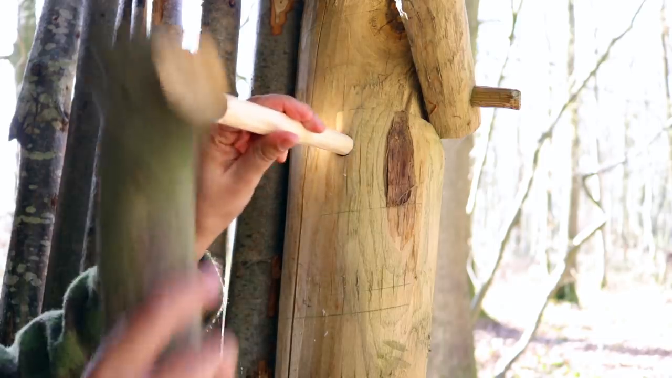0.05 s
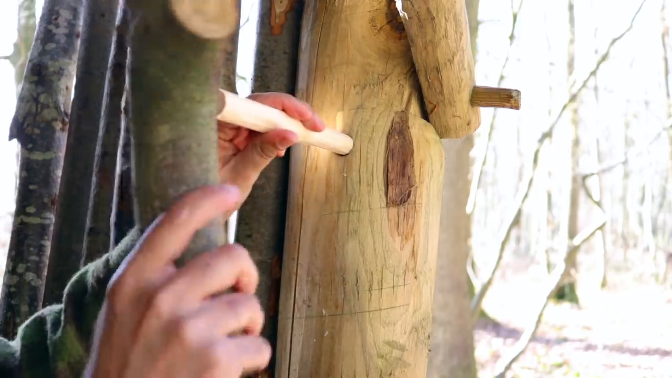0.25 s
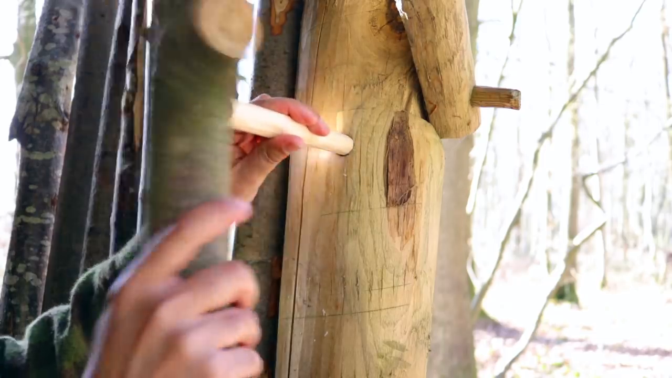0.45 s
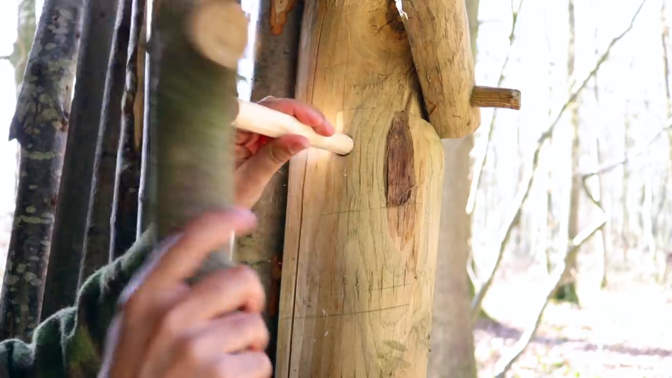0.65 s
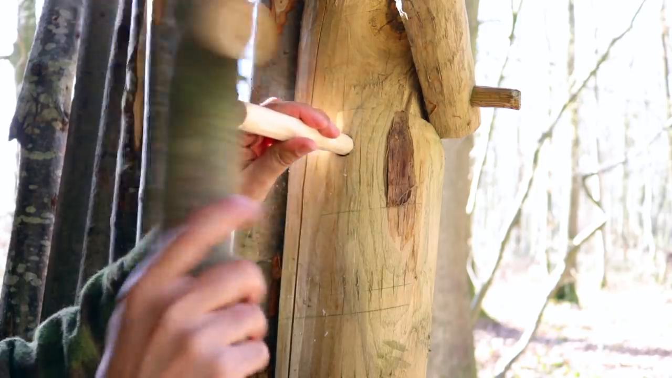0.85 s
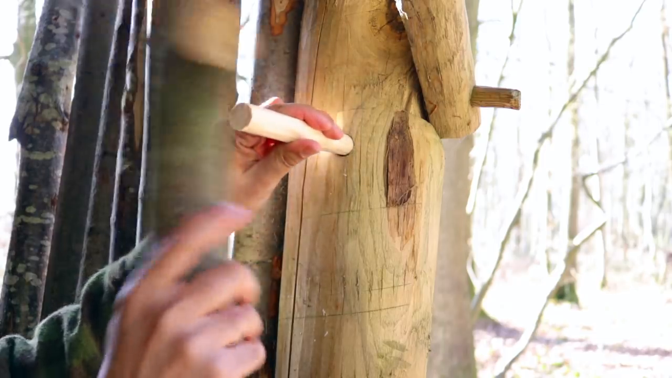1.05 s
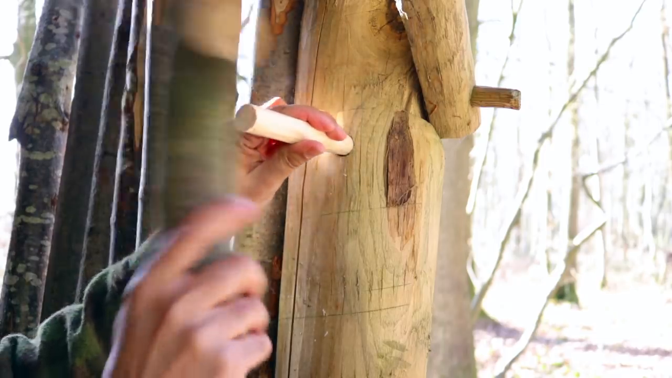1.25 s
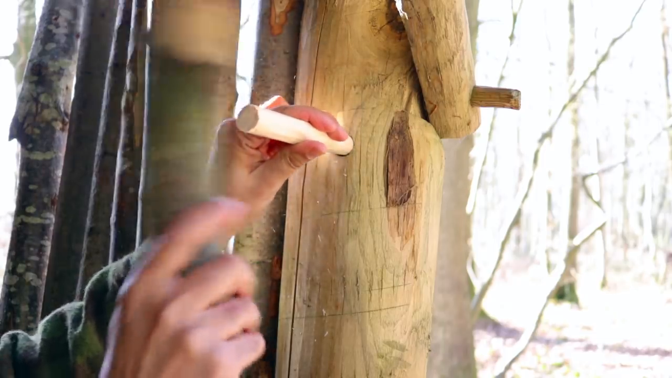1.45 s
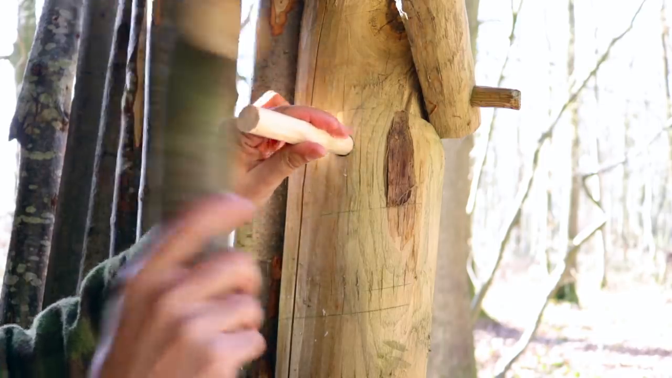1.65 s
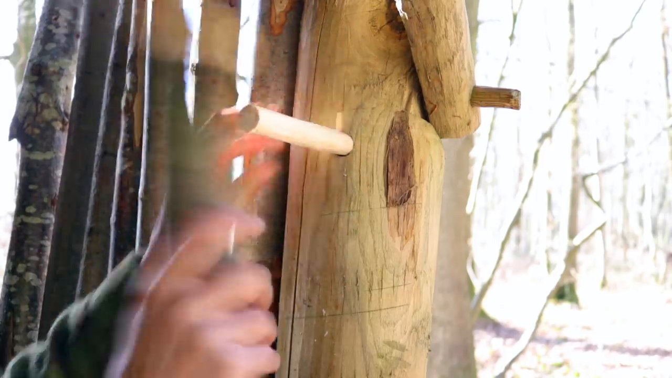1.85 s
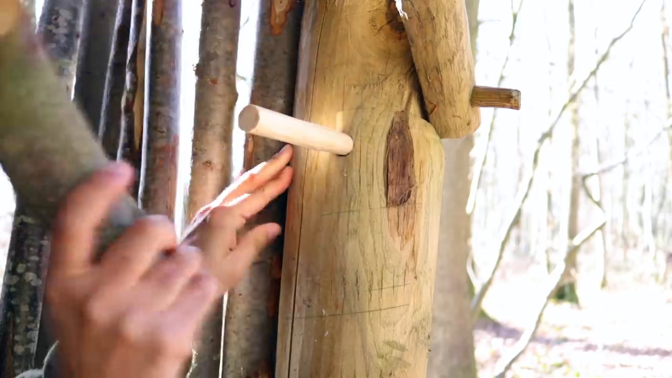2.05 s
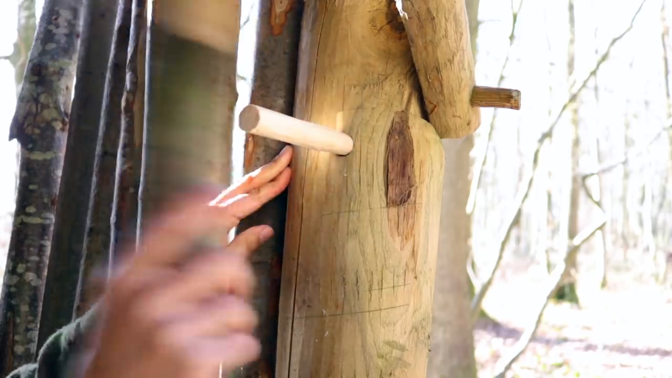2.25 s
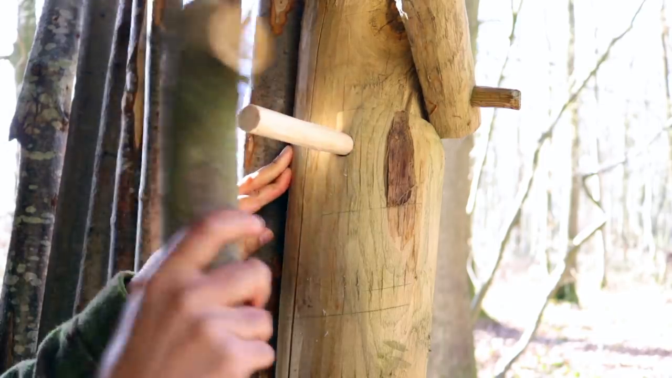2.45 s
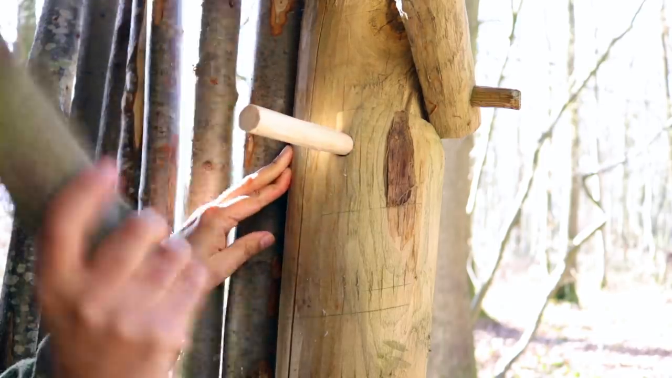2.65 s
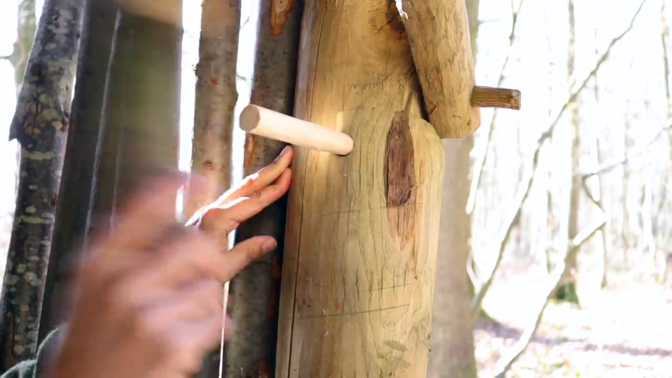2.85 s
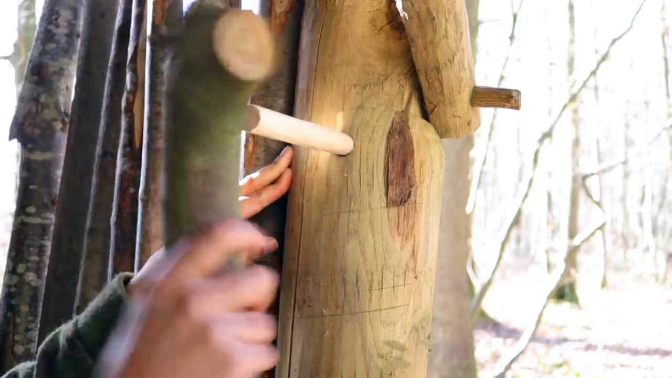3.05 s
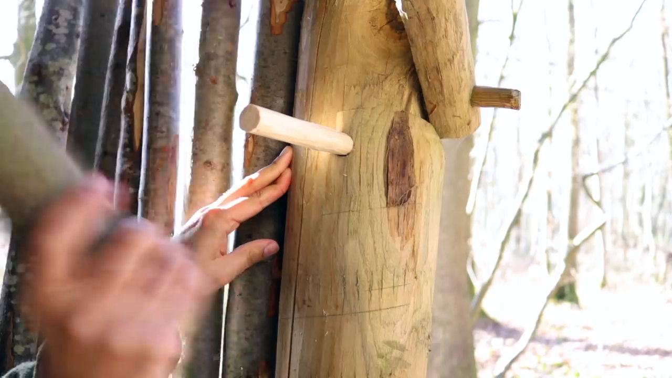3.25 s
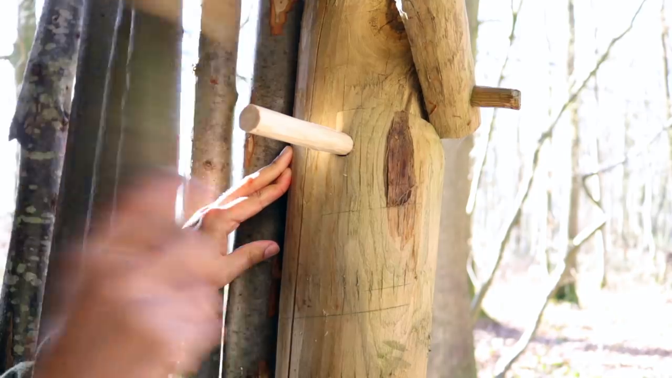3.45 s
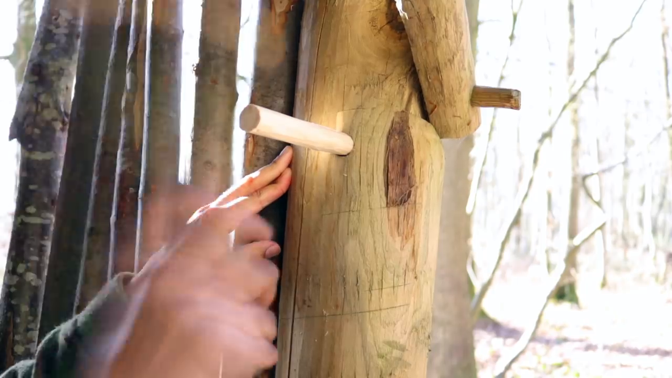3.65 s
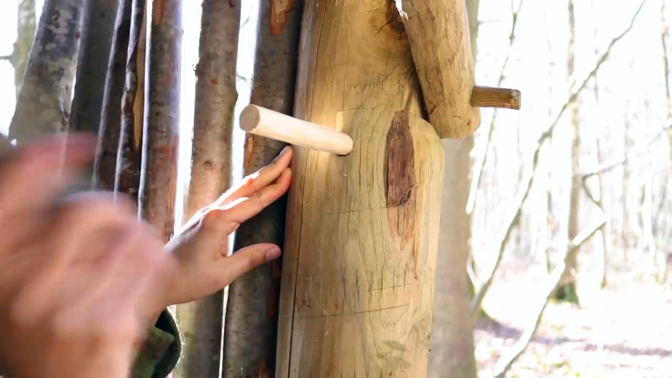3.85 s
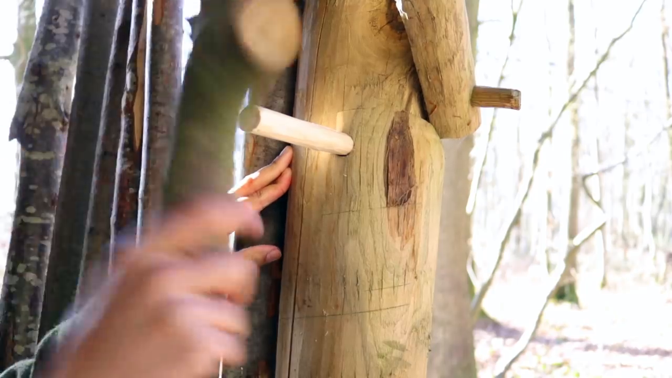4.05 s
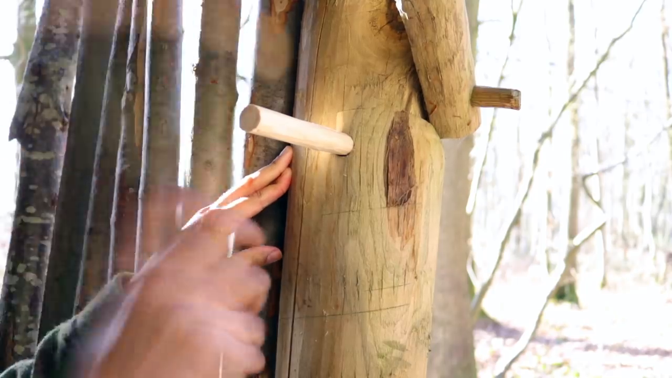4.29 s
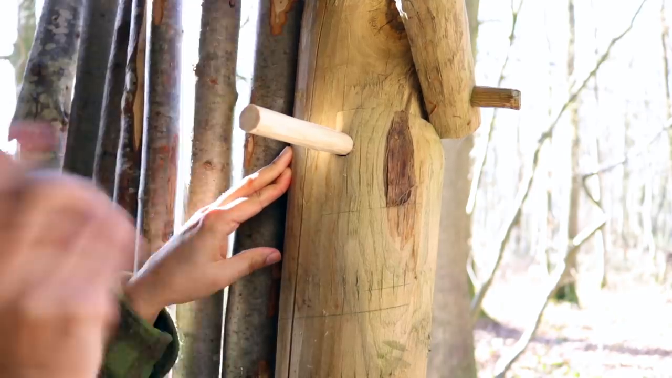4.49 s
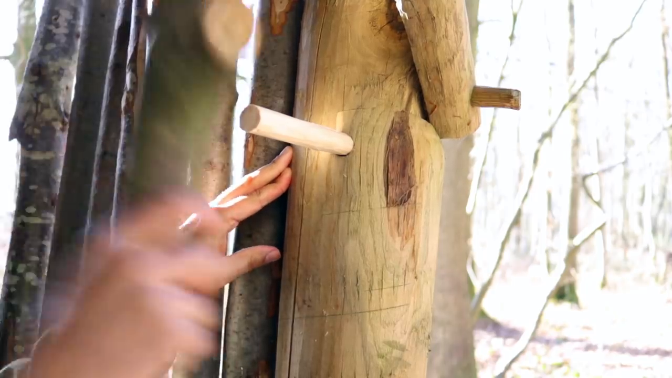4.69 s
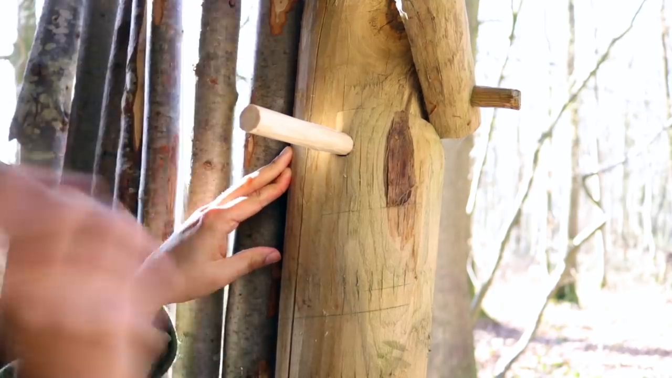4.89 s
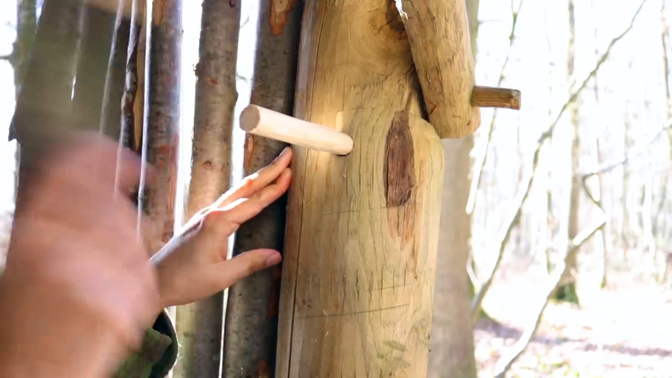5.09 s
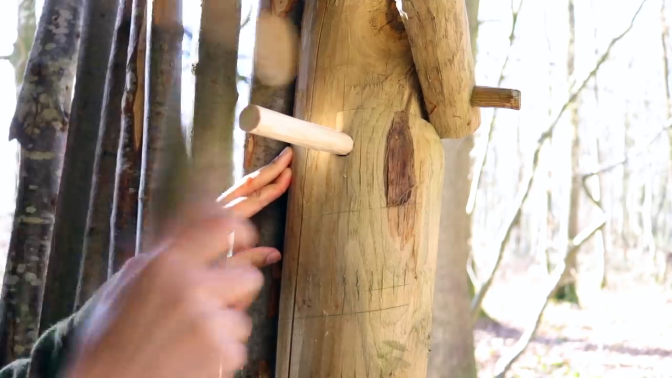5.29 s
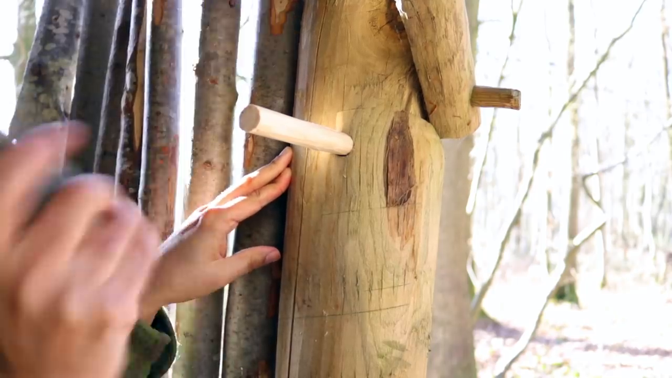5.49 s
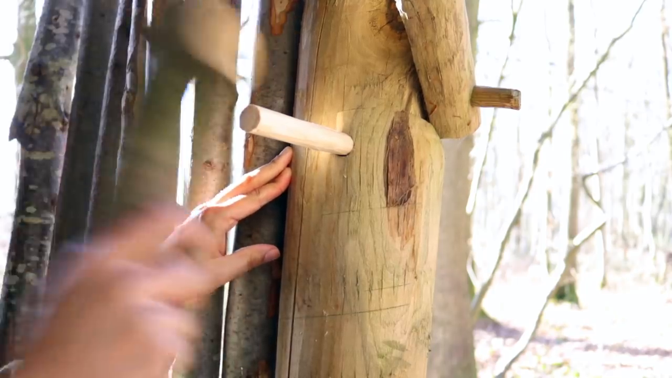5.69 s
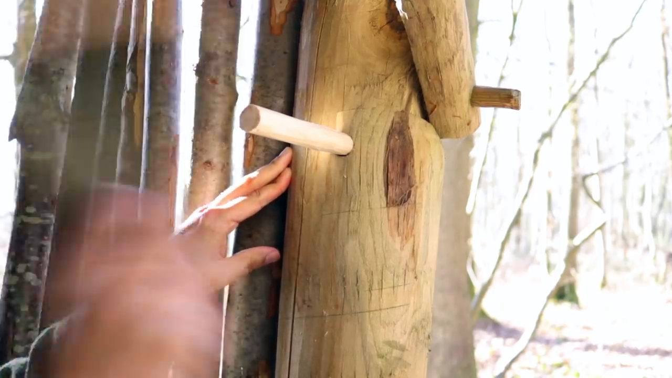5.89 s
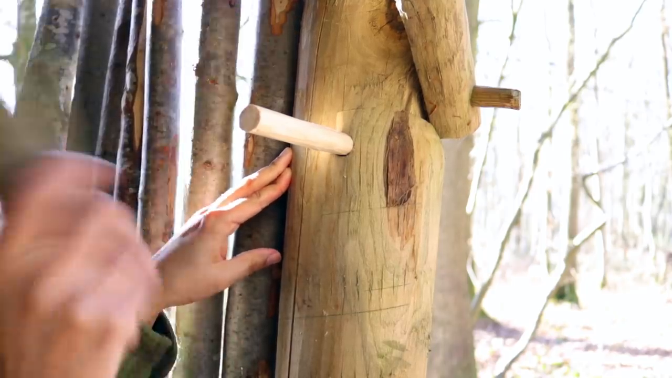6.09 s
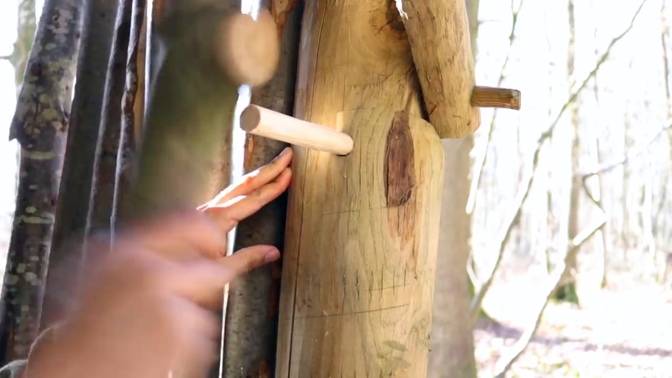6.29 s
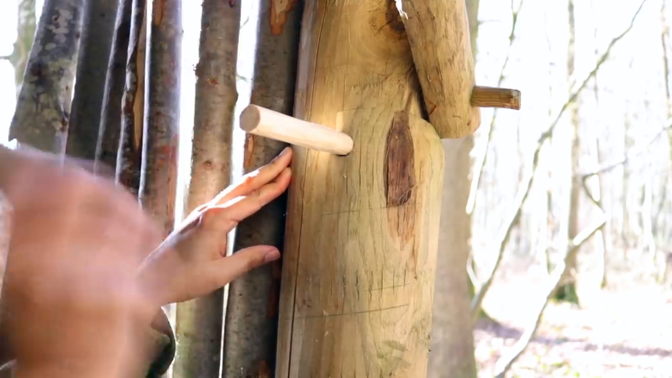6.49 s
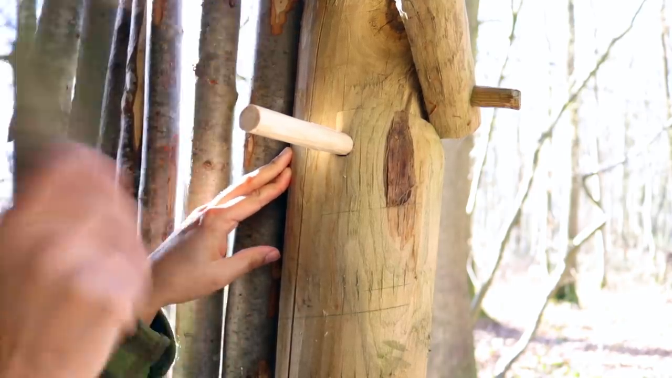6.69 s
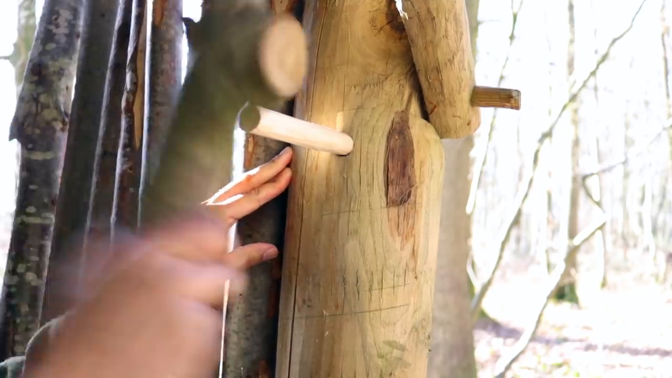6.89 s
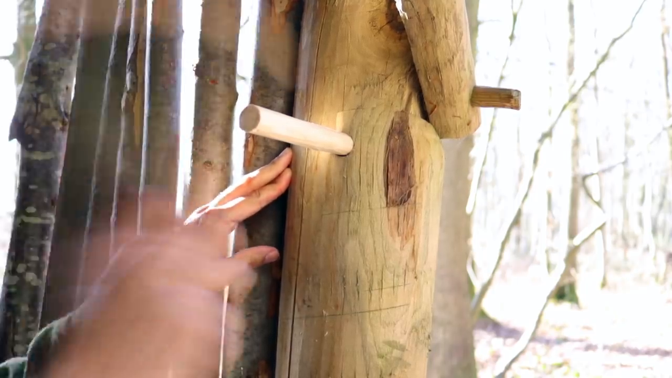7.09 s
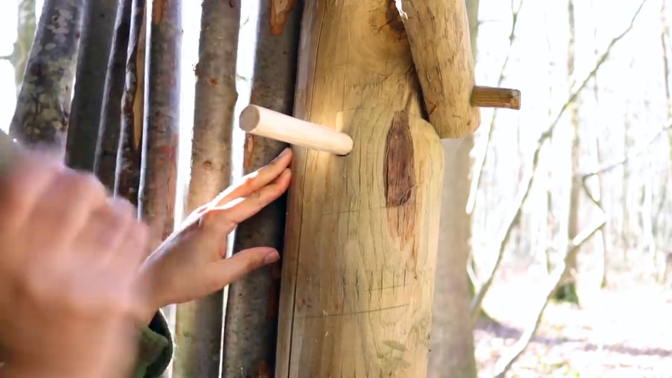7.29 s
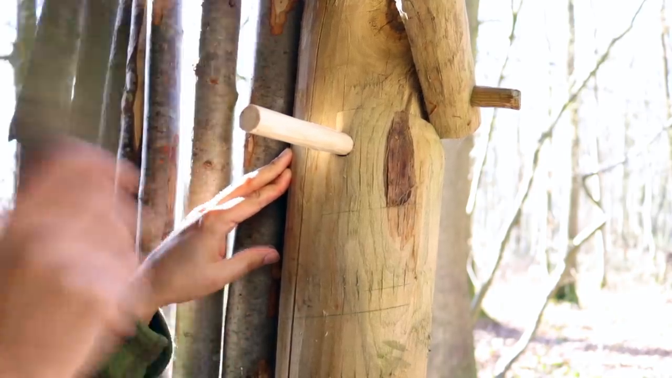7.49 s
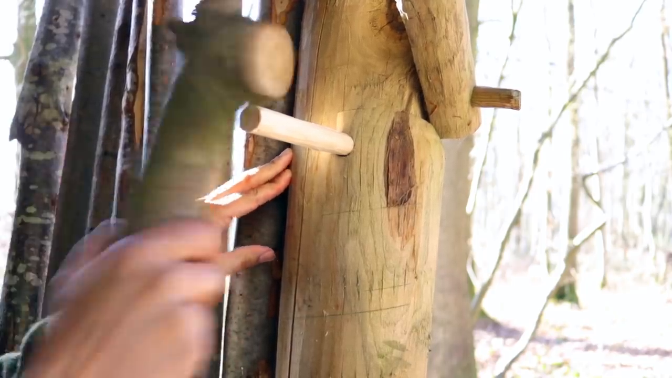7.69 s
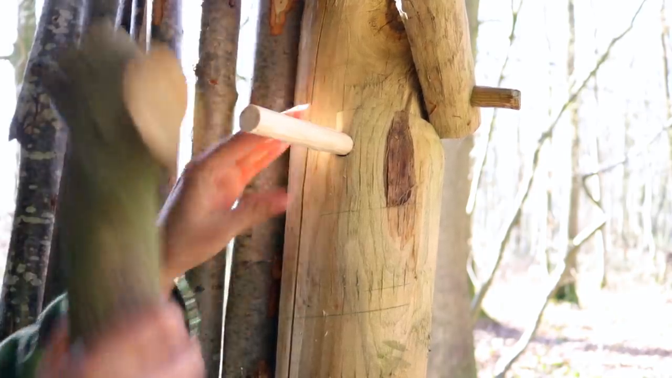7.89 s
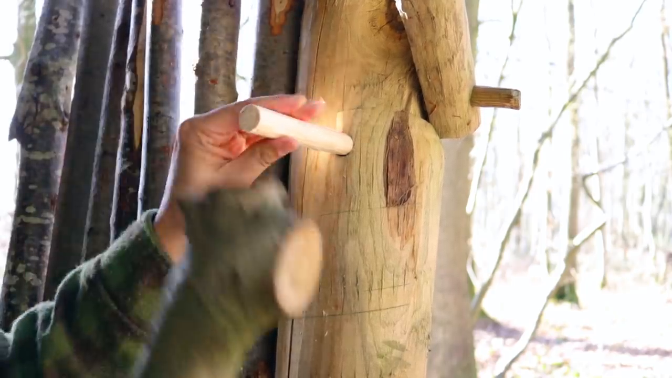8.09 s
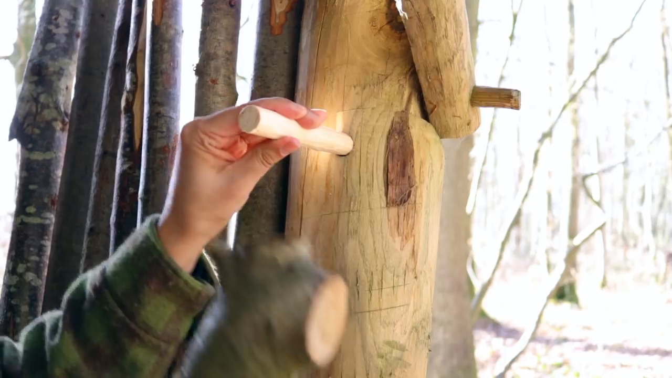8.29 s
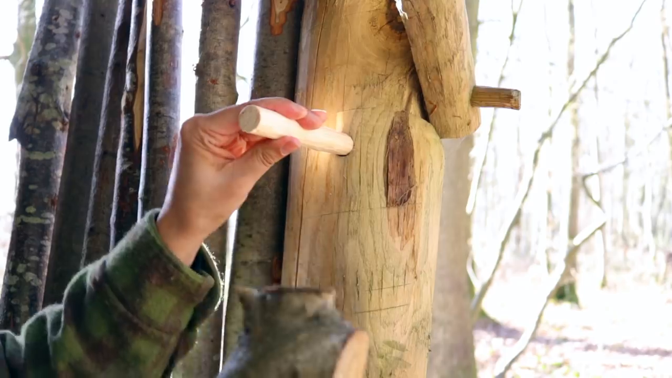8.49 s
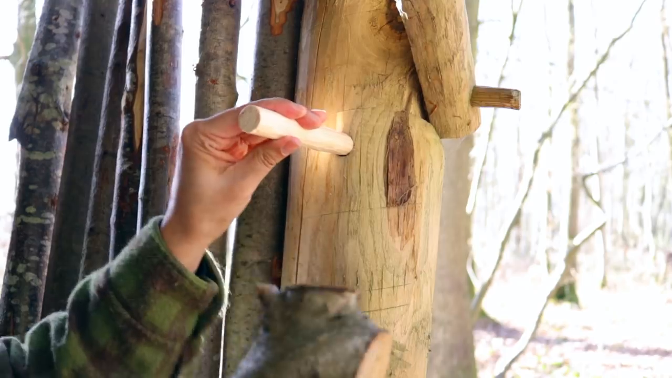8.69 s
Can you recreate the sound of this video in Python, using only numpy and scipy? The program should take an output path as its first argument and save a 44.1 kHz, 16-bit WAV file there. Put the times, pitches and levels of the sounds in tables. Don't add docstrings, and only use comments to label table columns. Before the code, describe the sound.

Outdoor wood-on-wood hammering at arm's length, mono. Bright thin taps about five a second become full, punchy thocks about three a second, with low thump, rattle and brief scatter off ground and trunks. Four faint falling bird phrases sound in the early part. The blows stop after one last hard hit, leaving low traffic hum, hiss and tiny twig ticks.

```python
import sys
import numpy as np
from scipy import signal
from scipy.fft import rfft, irfft
from scipy.io import wavfile
from scipy.ndimage import uniform_filter1d

SR = 44100
rng = np.random.default_rng(int(sys.argv[2]) if len(sys.argv) > 2 else 0)


def level_to_linear(level):
    exponent = np.asarray(level, float) / 20
    return 10 ** exponent


def dump_mix(stems):
    frames = np.atleast_2d(stems).T
    limited = np.clip(frames, -1, 1)
    pcm = np.round(limited * 32767).astype(np.int16)
    wavfile.write(sys.argv[1], SR, pcm)


N = 385343


def band(x, hz, width):
    return signal.lfilter(*signal.iirpeak(hz, hz / width, fs=SR), x)


def filtered(x, order, hz, kind):
    return signal.sosfilt(signal.butter(order, hz, kind, fs=SR, output="sos"), x)


def fade(t, t60):
    return level_to_linear(-60 * t / t60)


def add(track, sound, s):
    i = int(s * SR)
    track[i:i + len(sound)] += sound[:N - i]


# f/Hz, level/dB per Hz
AIR_SPECTRUM = [(20, -6), (69, 1.5), (160, -2), (939, -3.5), (2510, -22.5), (4530, -32), (15200, -36),
                (16500, -44)]


def air():
    level_db, swell_db = -66.5, 1.0
    hz, db = np.transpose(AIR_SPECTRUM)
    f = np.arange(N // 2 + 1) * SR / N + 1
    shape = level_to_linear(np.interp(np.log(f), np.log(hz), db))
    noise = irfft(rfft(rng.standard_normal(N)) * shape, N)
    swell = np.interp(np.arange(N), np.linspace(0, N, 30), rng.standard_normal(30))
    return noise / noise.std() * level_to_linear(level_db + swell_db * swell)


# t/s, peak level/dB, centre f/Hz, decay/ms
TICKS = [
    (0.054, -70, 2500, 12),
    (.18, -69.5, 3500, 10),
    (2.6785, -48, 6900, 0.54),
    (3.567, -55, 3940, 0.63),
    (7.977, -55, 2500, 1.9),
    (8.123, -67, 4000, 2.1),
    (8.145, -76, 3000, 3),
    (8.569, -72, 6000, 1.1),
]


def ticks():
    t = np.arange(SR // 10) / SR
    out = np.zeros(N)
    for s, db, hz, ms in TICKS:
        burst = band(rng.standard_normal(len(t)), hz, hz)
        add(out, level_to_linear(db) * burst * np.exp(-t * 1000 / ms), s)
    return out


# t/s, level/dB, knock f/Hz, rebound lag/ms, rebound level/dB
TAPS = [
    (0.4752, -17.5, 1430, 2.36, 1.5),
    (0.6692, -8, 1590, 2.75, -7),
    (0.8543, -7.5, 1620, 1.61, -4),
    (1.0462, -7, 1300, 2.06, -12.5),
    (1.2407, -3.5, 1530, 1.07, -8.5),
    (1.4352, -3.5, 1394, 1.4, -11),
    (1.6213, -6.5, 1420, 2.1, -10.5),
    (1.9245, -7, 823, 1.74, 0.5),
]
# t/s, level/dB, rebound level/dB, rattle level/dB
BLOWS = [(2.2084, -3.5, 7, 0), (2.5014, -1, 3, 1), (2.7996, 0, -2.5, 0.), (3.0901, 7.5, -1.5, -0.5),
         (3.3910, 6.5, 2, 1), (3.4359, -22, 6, 0.), (3.7248, 2.5, 1.5, 1), (4.0412, 5.5, -3.5, 0.),
         (4.3651, 3, 2, 0.5), (4.6960, 2, 1, -0.5), (5.0209, 1.5, 1, -0.5), (5.3527, 4, -1.5, 0.5),
         (5.672, 3.5, -1.5, -0.5), (5.989, 1, -2, 3.5), (6.298, 4.5, 1.5, 0.5), (6.6179, 4, -3.5, 1),
         (6.9016, 1, 2, 0.5), (7.1718, 1.5, 2.5, 0.), (7.4380, 4, -6.5, 0.), (7.691, 9.5, -2, 0.)]
# t/s, post level/dB, thump level/dB
GRIP = [(.47, -49.5, -64), (.67, -40, -55), (1.05, -38, -48), (1.62, -15.5, -45), (2.2, -7, -28.5),
        (2.85, -3.5, -24.5), (3.05, -2.5, -18), (4.0, -2.5, -16.5), (7.7, -3.5, -16)]


def strokes():
    seated_hz, seated_spread, seated_lag_ms = 676, 0.009, 1.461
    most_post_db = 3.5
    hits = [(*tap, 0) for tap in TAPS]
    for s, db, rebound_db, rattle_db in BLOWS:
        hz = seated_hz * (1 + seated_spread * rng.standard_normal())
        hits.append((s, db, hz, seated_lag_ms, rebound_db, rattle_db))
    grip_s, grip_post_db, grip_thump_db = np.transpose(GRIP)
    rows = []
    for hit in hits:
        share_db = np.interp(hit[0], grip_s, grip_post_db) - hit[1]
        excess_db = max(share_db - most_post_db, 0)
        thump_db = np.interp(hit[0], grip_s, grip_thump_db) - excess_db
        rows.append((*hit, share_db - excess_db, thump_db))
    return rows


def knock_pulse(t, hz, loose):
    seated_cycles, loose_cycles, lean = 0.7, 0.62, 0.2
    age = t * hz / (seated_cycles + loose * (loose_cycles - seated_cycles))
    swell = age ** (1 + lean * loose) * np.exp(1 - age ** (2 - 0.52 * loose))
    knock = np.sin(2 * np.pi * hz * t) * swell
    return knock - swell * knock.sum() / swell.sum()


def low_thump(t):
    peak_ms, width_ms = 3, 5.4
    lurch = (t * 1000 - peak_ms) / width_ms
    return (2 * lurch ** 2 - 1) * np.exp(-lurch ** 2) * np.minimum(t * 2000, 1)


def ring(t, modes, scatter):
    hz, db, t60 = np.transpose(modes)[:, :, None]
    z_db, z_hz = scatter[:, :len(modes), None]
    tone = np.sin(2 * np.pi * hz * (1 + 0.003 * z_hz) * t)
    return np.sum(level_to_linear(db + 1.2 * z_db) * fade(t, t60) * tone, axis=0)


# f/Hz, level/dB, t60/s
POST = [(102, -31.5, 0.22), (162.4, -6.5, 0.062), (258, -33, 0.061), (290, -18.5, 0.15),
        (413.6, -5.5, .055), (516, -6.5, 0.085), (571, -7, 0.034), (665, -28, 0.097), (667, -8.5, 0.029),
        (750, -13.5, 0.055), (875.4, -13, 0.035), (863, -39, 0.086), (1000, -20, 0.015), (357, -17, 0.029)]
# f/Hz, level/dB, t60/s
DOWEL = [(674, -14.5, 0.022), (1200, -23, 0.02), (1537, -12, 0.022), (1928, -4.5, 0.011),
         (2150, -16.5, 0.0081), (2857, -12, 0.02), (3396, -11, 0.011), (4340, -25.5, 0.014),
         (5560, -28.5, .008)]


def mallet():
    crack_db, crack_ms, dowel_db, snap_db = -20.5, 0.72, -6, 23
    t = np.arange(SR // 4) / SR
    thump = low_thump(t)
    close, far, thumps, snap = np.zeros((4, N))
    for s, db, hz, lag_ms, rebound_db, rattle_db, post_db, thump_db in strokes():
        z = rng.standard_normal((2, 32))
        loose = np.clip((-post_db - 5.5) / 12, 0, 1)
        knock = knock_pulse(t, hz, loose)
        crack = level_to_linear(crack_db) * rng.standard_normal(len(t)) * np.exp(-t * 1000 / crack_ms)
        rattle = level_to_linear(dowel_db + rattle_db + loose) * ring(t, DOWEL, 2 * z[::-1])
        push = np.hanning(int(np.clip(4 - 0.26 * db, 2, 30)) + 4)
        push /= push.sum()
        contact = np.convolve(knock + crack + rattle, push)[:len(t)]
        contact = filtered(contact, 2, 20 + 330 * loose, "high")
        post = level_to_linear(db + post_db) * ring(t, POST, z)
        add(close, level_to_linear(db) * contact + post, s)
        add(close, level_to_linear(db + rebound_db) * contact, s + lag_ms / 1000)
        add(thumps, level_to_linear(thump_db) * thump, s)
        add(far, level_to_linear(db - 4.5 * loose) * knock + post, s)
        add(snap, level_to_linear(db + snap_db - 5 * loose) * push, s)
    radiate_hz, snap_low_hz = 130, 400
    close = filtered(close, 2, radiate_hz, "high") + thumps
    far = filtered(far, 2, radiate_hz, "high") + filtered(snap, 2, snap_low_hz, "high")
    return close, far


# f/Hz, near level/dB, near t60/s, far level/dB, far t60/s
WOOD = [(74, -65.5, 0.12, -81, 0.98), (162.5, -61, 0.11, -82, 0.2), (429, -63, 0.15, -87, 0.72),
        (784, -60.5, 0.11, -84.5, 0.46), (1300, -59.5, 0.2, -84, 0.42), (1944.4, -53, 0.09, -86.5, 0.93),
        (2870, -53.5, .08, -82.5, 0.55), (5400, -63.5, 0.059, -104, 0.3), (10000, -70.5, .07, -106, .2)]


def wood():
    patchy_db, onset_s = 3.5, 0.00067
    t = np.arange(SR) / SR
    out = np.zeros(SR)
    for hz, near_db, near_t60, far_db, far_t60 in WOOD:
        noise = filtered(rng.standard_normal(SR), 3, [0.62 * hz, 1.22 * hz], "band")
        trunks = np.interp(t, np.arange(100) / 100, rng.standard_normal(100))
        decay = level_to_linear(near_db) * fade(t, near_t60) + level_to_linear(far_db) * fade(t, far_t60)
        out += noise / noise.std() * level_to_linear(patchy_db * trunks) * decay
    return out * (1 - np.exp(-t / onset_s))


# lag t/s, level/dB, centre f/Hz, width/Hz
ECHOES = [
    (.0057, -12, 570, 1700),
    (0.0172, -22, 600, 1700),
    (0.09, -46, 290, 660),
    (.085, -51, 3100, 1200),
    (.156, -43, 1500, 350),
]


def outdoors(close, far):
    out = close + signal.fftconvolve(far, wood())[:N]
    for lag, db, hz, width in ECHOES:
        echo = band(band(close, hz, 1.4 * width), hz, 1.4 * width)
        add(out, level_to_linear(db) * echo, lag)
    return out


def whistle(note):
    s, hz, db = np.transpose(note)
    t = np.arange(0, s[-1], 1 / SR)
    pitch = uniform_filter1d(np.interp(t, s, hz), size=200)
    return np.sqrt(2) * level_to_linear(np.interp(t, s, db)) * np.sin(2 * np.pi * np.cumsum(pitch) / SR)


# t/s after its start, f/Hz, level/dB
HIGH_NOTE = [(0, 6624, -18.5), (.01, 6900, -9.5), (.022, 6985, -0.5), (.031, 6730, -7), (.045, 5600, 3.5),
             (.06, 4750, 3), (.065, 4600, -17.5)]
LOW_NOTE = [(0, 5340, -24.5), (.005, 4464, -11.5), (.02, 3917, 0.5), (.035, 3493, 0), (.055, 2890, -11),
            (.07, 2602, -17.5), (.085, 2488, -22.5)]
# high note t/s, level/dB, low note t/s, level/dB
PHRASES = [
    (1.966, -77, 2.088, -66),
    (2.269, -69, 2.385, -63),
    (2.556, -68, 2.678, -62.5),
    (2.853, -69.5, 2.971, -61.5),
]


def bird():
    echo_db, echo_t60 = -38, 0.5
    out = np.zeros(N)
    for high_s, high_db, low_s, low_db in PHRASES:
        add(out, level_to_linear(high_db) * whistle(HIGH_NOTE), high_s)
        add(out, level_to_linear(low_db) * whistle(LOW_NOTE), low_s)
    t = np.arange(SR // 2) / SR
    trees = level_to_linear(echo_db) * rng.standard_normal(len(t)) * fade(t, echo_t60)
    return out + signal.fftconvolve(out, trees)[:N]


def scene():
    mix = air() + ticks() + outdoors(*mallet()) + bird()
    return mix[None]


def top_cut(x):
    return signal.sosfilt(signal.butter(12, 16820, fs=SR, output="sos"), x)


def record(dry):
    ceiling, low_hz, top_hz = 0.57, 24, 16000
    x = dry / (1 + np.abs(dry / ceiling) ** 8) ** (1 / 8)
    x = filtered(x, 1, low_hz, "high")
    x = filtered(x, 10, top_hz, "low")
    return top_cut(x)


dry = scene()
out = record(dry)
dump_mix(out)
```